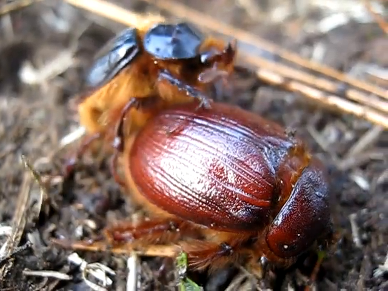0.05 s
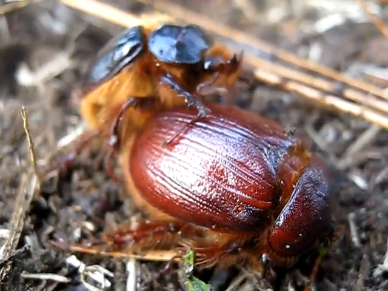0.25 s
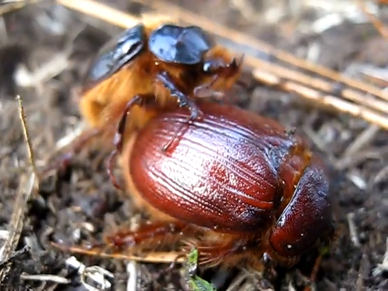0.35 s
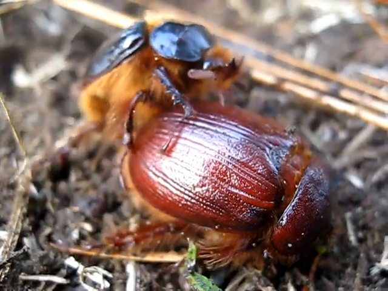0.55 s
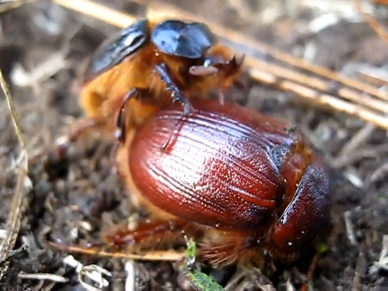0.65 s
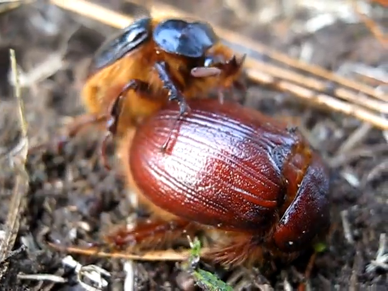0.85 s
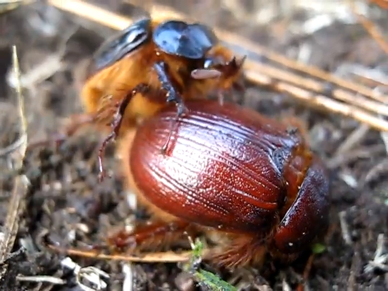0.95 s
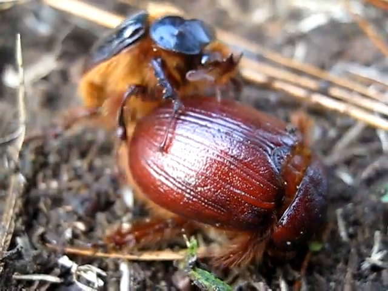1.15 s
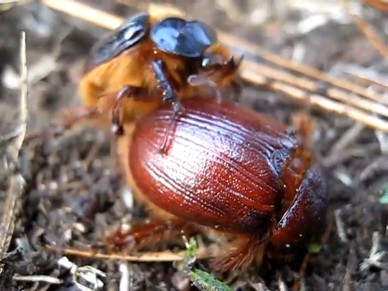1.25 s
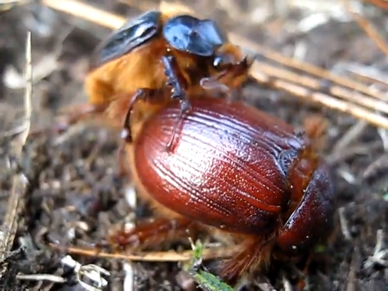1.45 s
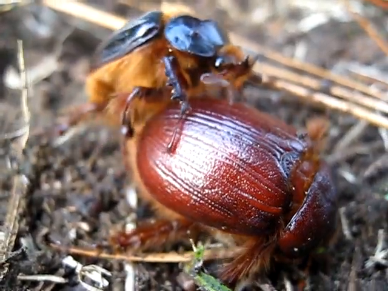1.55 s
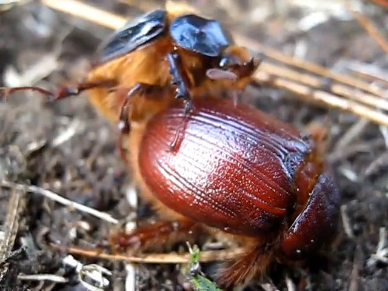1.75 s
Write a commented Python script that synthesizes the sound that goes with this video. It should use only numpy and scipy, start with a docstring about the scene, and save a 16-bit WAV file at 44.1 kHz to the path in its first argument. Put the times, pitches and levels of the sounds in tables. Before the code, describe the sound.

Beetle legs scraping and scratching on soil, with small clicks and crackling dry litter, very close.

```python
"""Two beetles shove about on soil and dry plant litter, very close to the microphone.
Their legs scrape by stick-slip friction, a rapid train of tiny slips that excites resonances:
first a long gritty drag, then shorter, duller pushes. Now and then a claw catches and lets go.
Dry fibres crackle and snap by brittle fracture, over a faint outdoor background."""
import sys
import numpy as np
from scipy import signal
from scipy.io import wavfile
from scipy.ndimage import uniform_filter1d

SR = 44100
rng = np.random.default_rng(int(sys.argv[2]) if len(sys.argv) > 2 else 0)


def unload_audio(sound):
    """Save the sound as a 16-bit wav file, at the path given as the first command line argument."""
    columns = np.transpose(np.atleast_2d(sound))
    # keep every value between -1 and 1, then stretch to whole-number steps
    steps = np.round(np.clip(columns, -1, 1) * 32767)
    wavfile.write(sys.argv[1], SR, steps.astype(np.int16))


N = 79380  # 1.8 s


def amp(db):
    """The decibel law: 20 dB is a factor of ten in amplitude."""
    return 10 ** (np.asarray(db) / 20)


def unit(x):
    """Normalisation to an rms of 1."""
    return x / np.sqrt(np.mean(x ** 2) + 1e-20)


def add(mix, start_s, sound):
    """Superposition: a sound adds to the mix from its start time."""
    part = mix[max(round(start_s * SR), 0):][:len(sound)]
    part += sound[:len(part)]


def response(spectrum, peaks=(), size=4096):
    """Minimum-phase impulse response, of energy 1, of a broad spectrum with resonance peaks."""
    hz, db = np.transpose(spectrum)
    f = abs(np.fft.fftfreq(size, 1 / SR))
    broad_db = np.interp(np.log(f + 1), np.log(hz + 1), db)
    peaks_db = sum(lift / (1 + (2 * (f - centre) / width) ** 2) for centre, width, lift in peaks)
    log_gain = np.log(amp(broad_db + peaks_db))
    transfer = np.exp(np.conj(signal.hilbert(log_gain)))
    h = np.fft.ifft(transfer).real[:size // 2]
    return h / np.linalg.norm(h)


def through(x, h):
    """Convolution: every sample of x excites the impulse response h."""
    return signal.fftconvolve(x, h)[:len(x)]


def grains(per_s, spread_db):
    """A Poisson process: independent impulses of random sign and size."""
    impulses = (rng.random(N) < per_s / SR) * rng.choice([-1, 1], N)
    return impulses * amp(spread_db * np.clip(rng.standard_normal(N), -2, 2))


def pressure(start, hold, db, rise, fall):
    """Exponential growth and decay about a held level, by 20 dB per rise or fall time."""
    t = np.arange(N) / SR - start
    return amp(db - 20 * (np.maximum(-t, 0) / rise + np.maximum(t - hold, 0) / fall))


def steadied(x, size=400):
    """Division by the running rms evens out the slow level and keeps the fine grain."""
    return x / np.sqrt(abs(uniform_filter1d(x ** 2, size)) + 1e-12)


def treble_shelf(x, db, corner_hz=4000):
    """A zero-phase shelving filter lifts or lowers the treble."""
    highpass = signal.butter(2, corner_hz, "high", fs=SR, output="sos")
    return x + (amp(db) - 1) * signal.sosfiltfilt(highpass, x, padtype=None)


# Broad spectra of gritty and dull friction. Each row: frequency in Hz, relative level in dB.
GRITTY_SPECTRUM = [(120, -57), (270, -26.5), (550, -18.5), (900, -14), (1320, -7), (1900, -6.5),
                   (2250, -10), (3200, -14.5), (4200, -25.5), (5600, -23.5), (7800, -27), (9500, -35),
                   (14500, -33.5), (16000, -41)]
DULL_SPECTRUM = [(120, -48), (300, -25), (700, -17.5), (1100, -10), (1600, -7.5), (2200, -8.5), (3200, -14),
                 (4200, -24), (5700, -22), (7000, -25), (7900, -36), (13500, -41), (16000, -45)]
# Resonances on those spectra. Each row: centre in Hz, width in Hz, lift in dB.
GRITTY_RESONANCES = [(724, 36, 10.5), (1325, 240, 8.5), (1620, 110, 3), (2625, 340, 7), (3496, 300, 10.5),
                     (4964, 320, 11.5), (6510, 260, 11), (10630, 500, 12), (13500, 610, 7.5)]
DULL_RESONANCES = [(1033, 116, 4.2), (1380, 225, 9), (1596, 137, 9.3), (1818, 115, 8.5), (2690, 450, 3.6),
                   (3370, 280, 4.5), (5040, 300, 5.7), (6510, 540, 8.4)]
# Leg strokes of the drag and the pushes. Each row: start of full pressure in seconds, hold in seconds,
# level before the treble shelf in dB, rise and fall in seconds, treble gain in dB, judder depth in dB.
DRAG_STROKES = [(0.002, 0.0055, -30.5, 0.015, 0.043, -4, 3), (.18, 0.033, -48.5, 0.018, .02, 7, 5),
                (.238, .02, -23.5, 0.017, 0.02, 2.5, 10), (.322, 0.012, -22.5, 0.022, 0.041, 2, 5),
                (.387, 0.02, -30.5, 0.021, 0.047, -6, 12), (.404, 0.021, -25, 0.029, 0.0054, 4.5, 6),
                (.448, 0.013, -29, 0.019, 0.01, -14, 5), (.466, 0.057, -19.5, .02, 0.066, 1, 6),
                (.602, 0.044, -29.5, 0.03, 0.023, 6.5, 0)]
PUSH_STROKES = [(.6, 0.047, -34.5, 0.13, 0.038, 14, 2), (.701, 0.0095, -26, 0.022, 0.024, 7.5, 2),
                (.725, .045, -39.5, .02, .03, 10, 8), (.783, 0.019, -23, 0.025, 0.032, 3, 2.5),
                (.83, 0.016, -40, .02, 0.033, 3, 8), (.908, 0.022, -25.5, 0.015, 0.029, 0.5, 2),
                (.951, 0.038, -25.5, .015, 0.0083, -1.5, 1), (1.109, 0.012, -24.5, 0.011, 0.035, 1, 3),
                (1.328, 0.0055, -22, 0.0046, 0.018, -5, 4), (1.345, 0.011, -39.5, 0.013, 0.0078, 5, 4)]


def leg_scrapes(strokes, body, judder_hz=150.1):
    """Stick-slip friction: tiny slips, modulated by the leg's irregular judder, ring a resonant body."""
    t = np.arange(N) / SR
    judder = np.interp(t * 2 * judder_hz, np.arange(N), rng.uniform(-0.84, 1, N))
    slips = grains(per_s=9000, spread_db=2)
    out = np.zeros(N)
    for *envelope, treble_db, judder_db in strokes:
        rasp = steadied(through(slips * amp(judder_db * judder), body))
        out += pressure(*envelope) * treble_shelf(rasp, treble_db)
    return out


def ground_scatter(direct, level_db=-13.5, decay_s=0.012, size=2000):
    """Diffuse reflection from the nearby soil adds a very short tail to the direct sound."""
    tail = rng.standard_normal(size) * np.exp(-np.arange(size) / SR / decay_s)
    return direct + amp(level_db) * through(direct, tail / np.linalg.norm(tail))


# Spectrum of the outdoor background. Each row: frequency in Hz, relative level in dB.
AIR_SPECTRUM = [(15, -56), (25, -18.5), (92, 1.5), (161, -2), (489, -7.5), (624, -1.5), (775, -2), (840, 4),
                (936, -5.5), (1100, -7), (1370, -10.5), (1700, -7.5), (2760, -18), (5880, -23.5),
                (6740, -24), (12900, -26), (16000, -32)]


def outdoor_air(level_db=-43):
    """Stationary filtered noise gives a steady background with a little hiss."""
    noise = through(rng.standard_normal(2 * N), response(AIR_SPECTRUM))
    return amp(level_db) * unit(noise[N:])


# A claw catches and lets go. Each row: start in seconds, level in dB, grittiness from 0 to 1,
# treble gain in dB.
CLAW_CATCHES = [(.008, -32.5, 0.3, -5), (0.147, -34, 0.2, 0), (.2527, -19.5, .9, -8), (.255, -22, 1, 12),
                (0.2576, -25, 0.8, 4), (0.3443, -22, 1, 12), (0.3509, -26.5, 1, 14), (.3615, -20, 0.6, 0),
                (.369, -23.5, .8, 0), (0.4347, -18, 0.9, 8.5), (0.4499, -21.5, 1, 4),
                (0.4725, -19, 0.6, -2), (0.4945, -22, 0.5, 3), (0.7069, -24, .2, 8), (0.786, -18.5, 0.8, 0),
                (1.3202, -14, 0, 5.5), (1.7, -41, 0.6, -2)]


def claw_catches(gritty, dull, decay_s=0.001, level_samples=130):
    """Impulsive excitation: a dying burst of hard slips rings the same bodies as the scrapes."""
    out, t = np.zeros(N), np.arange(len(gritty)) / SR
    for start, db, grittiness, treble_db in CLAW_CATCHES:
        slips = rng.choice([-1, 1], len(t)) * np.exp(-t / decay_s)
        body = grittiness * gritty + (1 - grittiness) * dull
        knock = treble_shelf(through(slips, body), treble_db)
        rms = np.linalg.norm(knock) / np.sqrt(level_samples)  # as if all its energy fell in 3 ms
        add(out, start, amp(db) * knock / rms)
    return out


# Spectrum of dry litter. Each row: frequency in Hz, relative level in dB.
LITTER_SPECTRUM = [(300, -2), (1200, -13), (2150, 6), (2800, -1), (5500, -0.5), (8000, -6), (11000, -4),
                   (14000, -13.5), (16000, -25)]
# The litter crumples. Each row: start of full pressure in seconds, hold in seconds, level in dB,
# rise and fall in seconds.
LITTER_CRUMPLES = [(.12, 0.015, -53, .03, 0.021), (.157, 0.0022, -47, .002, 0.0042),
                   (0.834, 0.03, -36, 0.0059, 0.019), (.88, 0.024, -43, 0.025, 0.018),
                   (0.953, 0.015, -32, 0.016, 0.026), (1.05, 0.006, -40.5, .003, 0.019),
                   (1.073, .005, -36, .002, 0.04), (1.205, 0.048, -52, 0.025, .02),
                   (1.39, 0.0079, -30.5, 0.0084, 0.0081)]


def litter_crackle(stray_db=-59):
    """Shot noise: dense crackle where the litter is pressed, and stray ticks of crumbs throughout."""
    body = response(LITTER_SPECTRUM)
    crackle = steadied(through(grains(per_s=6000, spread_db=4), body))
    stray = unit(through(grains(per_s=110, spread_db=5), body))
    return crackle * sum(pressure(*row) for row in LITTER_CRUMPLES) + amp(stray_db) * stray


# Dry fibres break. Each row: start in seconds, peak level of the tick in dB, ringing frequency in Hz.
FIBRE_SNAPS = [(0.1242, -33, 6900), (0.1579, -20.5, 5470), (0.294, -25, 5960), (0.7588, -19, 9000),
               (.7789, -21, 8900), (0.7805, -7.5, 7000), (.7889, -3.5, 6150), (.826, -27, 7500),
               (.8347, -13.5, 5400), (.8466, -17, 6000), (0.8615, -12, 10000), (0.871, -19, 7500),
               (0.877, -18, 7500), (.8891, -16, 9500), (0.8941, -12, 11000), (0.8979, -15, 8500),
               (.9208, -10, 5170), (0.931, -1, 10800), (0.9323, -6.5, 9000), (0.9349, -1.5, 5000),
               (0.9655, -8, 5100), (0.9695, -10, 10000), (1.0494, -9, 10100), (1.0496, -16.5, 5000),
               (1.0544, -21, 8500), (1.073, -22, 8900), (1.1366, -19.5, 11000), (1.1704, -25.5, 7860),
               (1.2167, -27, 5970), (1.23, -30, 6500), (1.2566, -23, 5150), (1.3786, -27, 9100),
               (1.3829, -16.5, 6000), (1.391, -20, 8000), (1.4714, -21, 7300), (1.5446, -19.5, 4830),
               (1.7222, -20.5, 11000), (1.7358, -21, 9500), (1.7431, -10.5, 9500), (1.7741, -19, 9500)]


def fibre_snaps(decay_cycles=0.25, tail_db=-24, tail_decay_s=0.0024, size=600):
    """Brittle fracture: each fibre gives a heavily damped oscillation and a faint splintering tail."""
    out, t = np.zeros(N), np.arange(size) / SR
    body = response(LITTER_SPECTRUM)
    for start, db, hz in FIBRE_SNAPS:
        cycles = hz * t
        ringing = cycles * np.exp(-cycles / decay_cycles) * np.sin(2 * np.pi * cycles)
        tick = np.gradient(ringing)
        tail = through(rng.standard_normal(size), body) * np.exp(-t / tail_decay_s)
        add(out, start, amp(db) * (tick / abs(tick).max() + amp(tail_db) * tail))
    return out


def scene():
    """Superposition of legs, fibres, litter and background in one channel."""
    gritty = response(GRITTY_SPECTRUM, GRITTY_RESONANCES)
    dull = response(DULL_SPECTRUM, DULL_RESONANCES)
    scrapes = leg_scrapes(DRAG_STROKES, gritty) + leg_scrapes(PUSH_STROKES, dull)
    legs = scrapes + claw_catches(gritty, dull)
    return (ground_scatter(legs) + fibre_snaps() + litter_crackle() + outdoor_air())[None]


def record(dry, cutoff_hz=15800):
    """Band limiting: a linear-phase low-pass filter removes the highest treble."""
    lowpass = signal.firwin(255, cutoff_hz, window=("kaiser", 9), fs=SR)
    return signal.oaconvolve(dry, lowpass[None], "same")


dry = scene()
out = record(dry)
unload_audio(out)
```